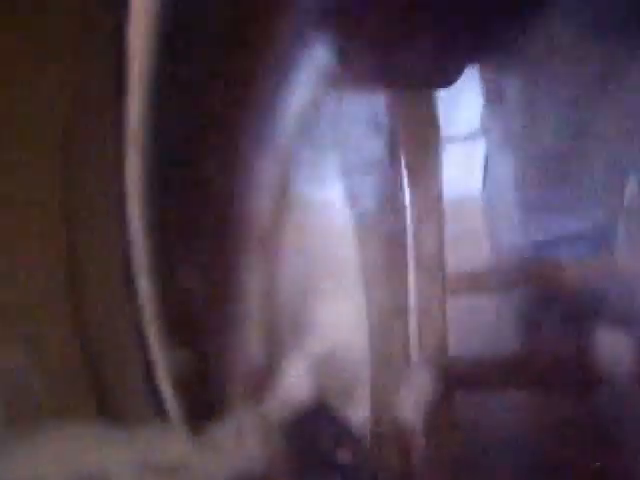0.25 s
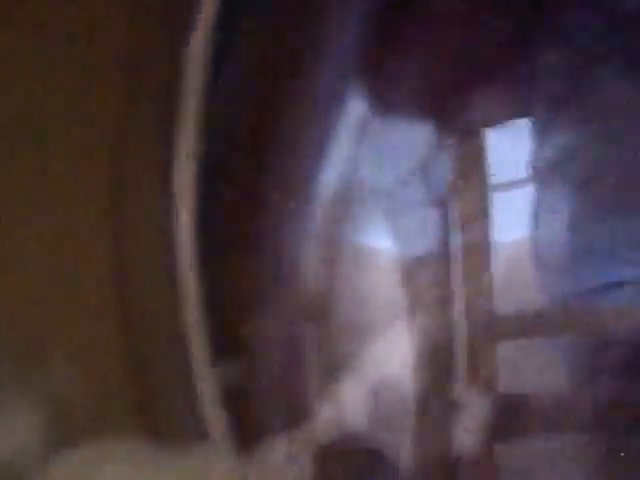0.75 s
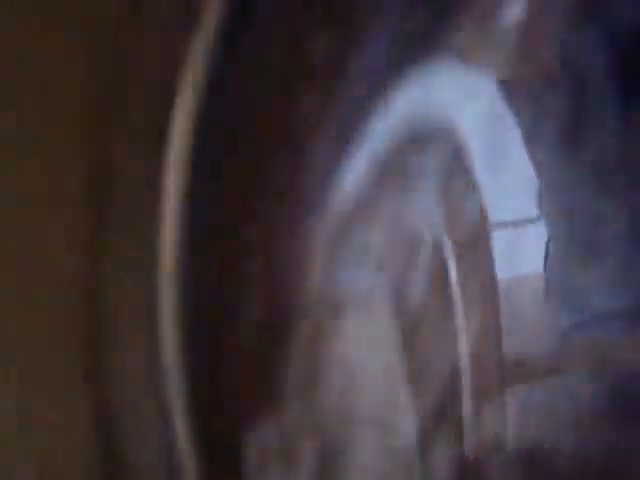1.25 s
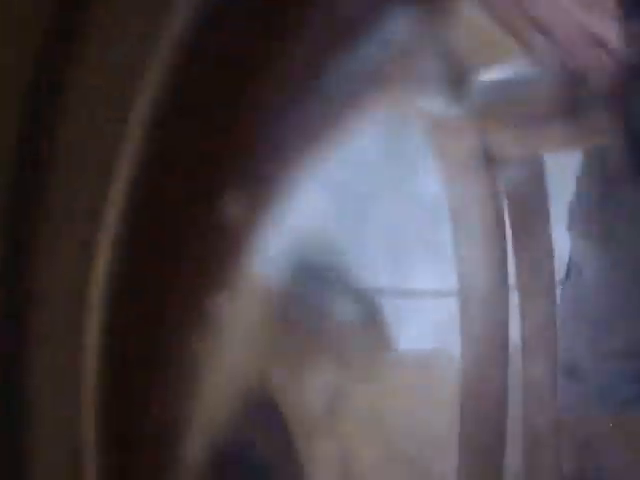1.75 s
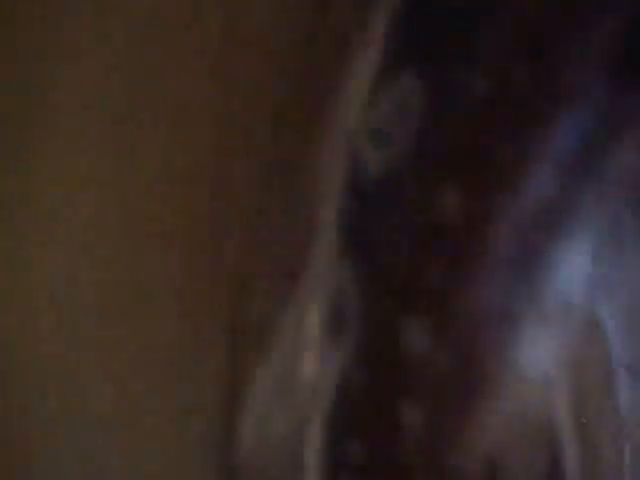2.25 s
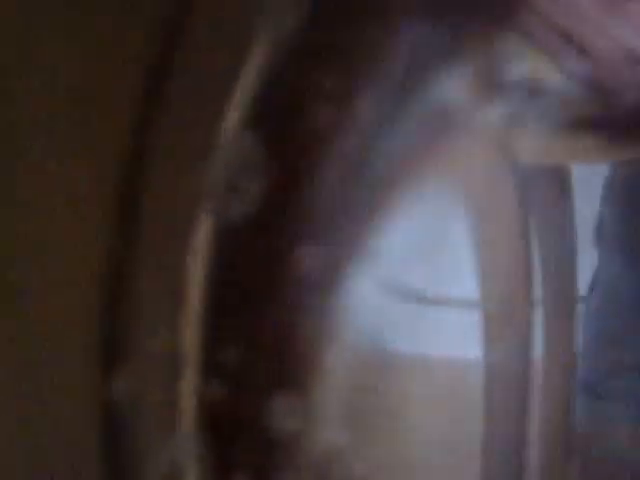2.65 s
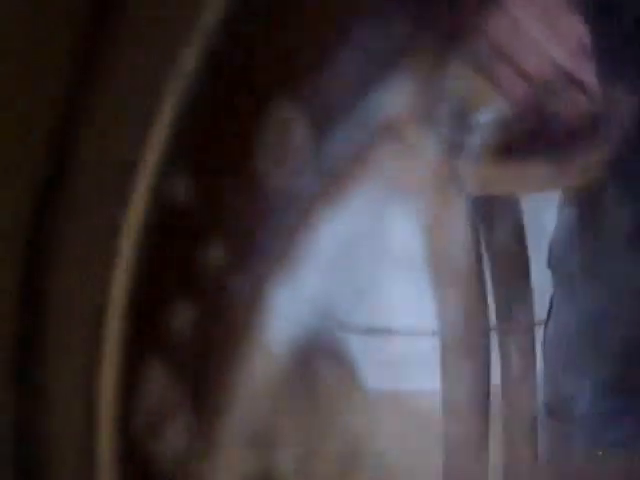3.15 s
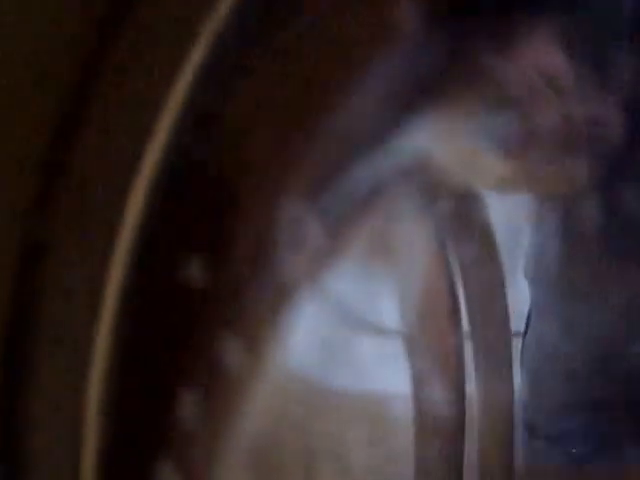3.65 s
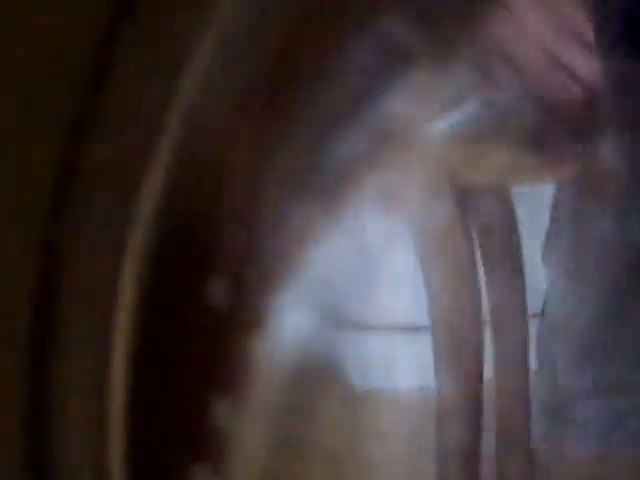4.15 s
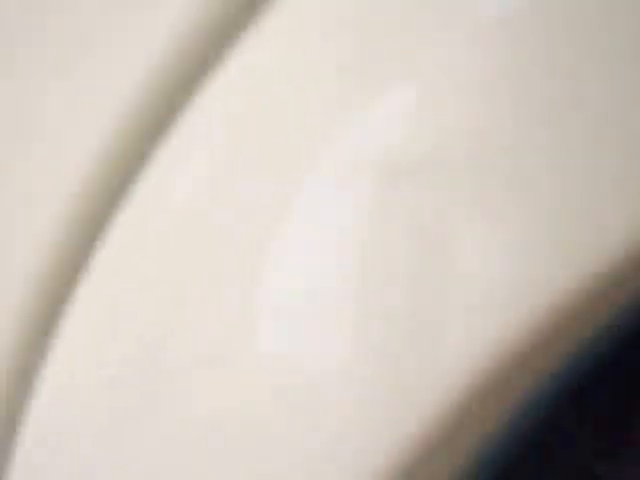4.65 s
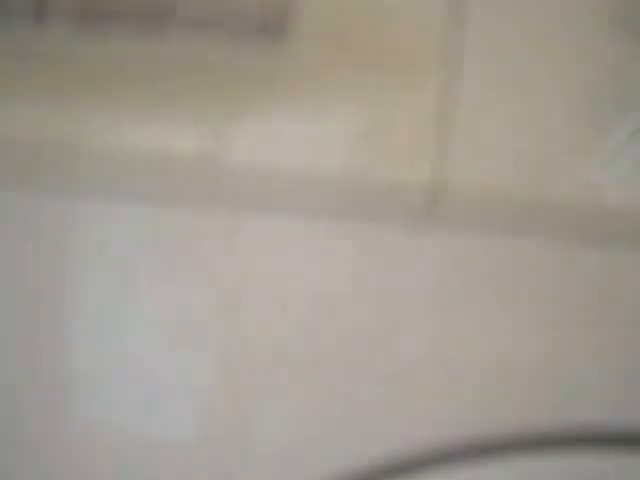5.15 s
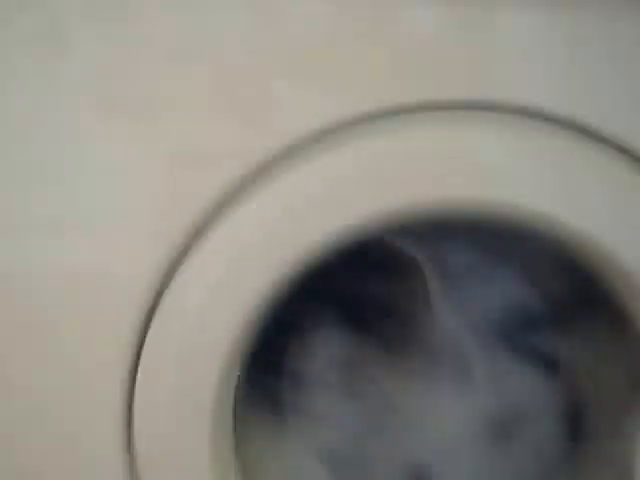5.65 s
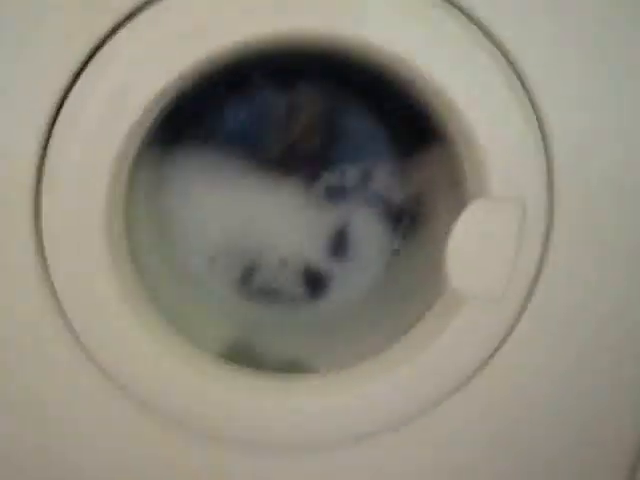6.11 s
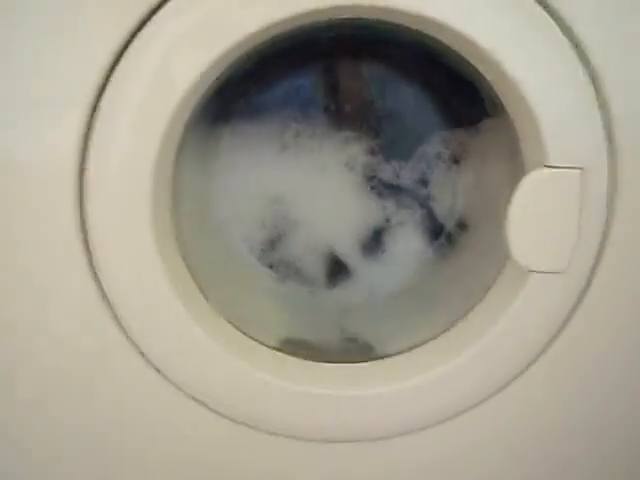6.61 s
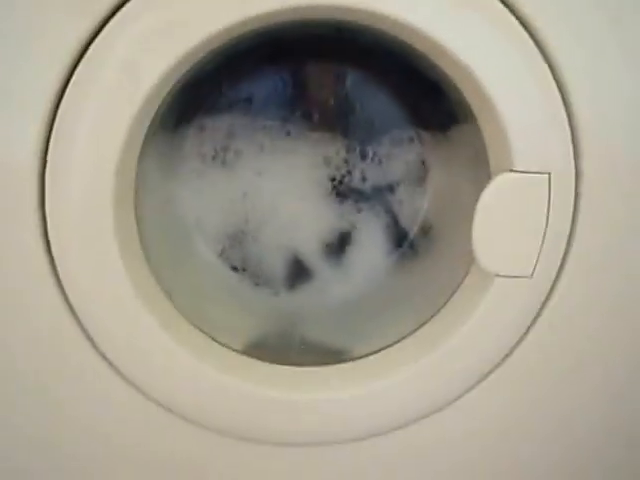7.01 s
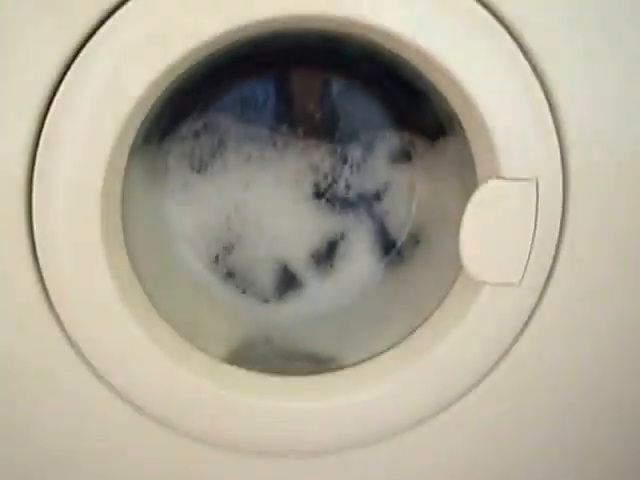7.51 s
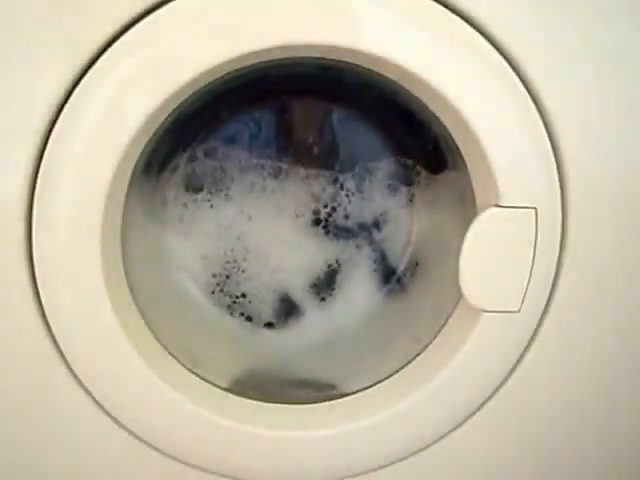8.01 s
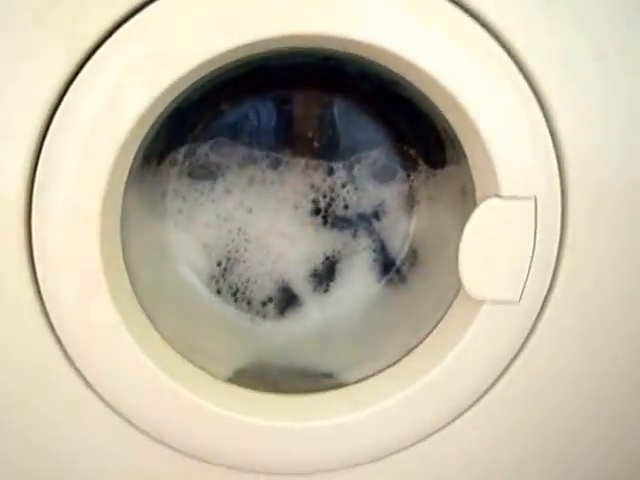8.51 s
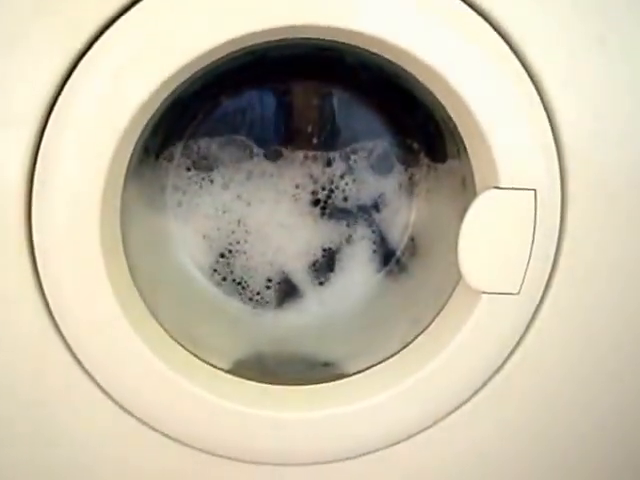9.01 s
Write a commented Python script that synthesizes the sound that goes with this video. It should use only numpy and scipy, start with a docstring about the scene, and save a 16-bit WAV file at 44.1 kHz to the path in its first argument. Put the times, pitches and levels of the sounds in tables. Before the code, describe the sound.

In a small room, a front-loading washing machine hums steadily with a thin whine while wet laundry churns and drops about twice a second. Occasional finger ticks and scrapes sound close by. After about five and a half seconds the motor cuts out, then the handheld camera is gripped anew: sharp clicks, hard thumps, hollow knocks and rubbing right at the microphone, fading to light touches over faint room tone.

```python
"""Washing machine and a handled camera

A front-loader in a small room turns its wet load: motor harmonics hum and whine, filtered noise churns and
fizzes, and bubbles ring at each drop, until the motor cuts out after 5.5 s and faint electronic tones remain.
Fingers on the small camera rub and scrape (shaped noise), click its plastic (short damped bursts), knock its
body (decaying modes) and push air at its microphone (pulses), most strongly as it is moved to a new grip."""
import sys
import numpy as np
from scipy import signal
from scipy.fft import rfft, irfft, next_fast_len
from scipy.io import wavfile
from scipy.ndimage import map_coordinates

SR = 44100
rng = np.random.default_rng(int(sys.argv[2]) if len(sys.argv) > 2 else 0)


def dump_mix(stems):
    """Bounce the given channels to the path in sys.argv[1] as a 16-bit WAV at rate SR."""
    frames = np.atleast_2d(stems).T  # one column per channel
    limited = np.clip(frames, -1, 1)  # hard clip at full scale
    pcm = np.round(limited * 32767).astype(np.int16)
    wavfile.write(sys.argv[1], SR, pcm)


N = 408807
TIME = np.arange(N) / SR


def amp(db):
    """Decibels to gain."""
    return 10 ** (np.asarray(db) / 20)


def unit(x):
    """Scale to rms 1."""
    return x / np.sqrt(np.mean(x ** 2) + 1e-20)


def along(points, hz):
    """Read (Hz, value) points on a log frequency axis."""
    f, v = np.transpose(points)
    return np.interp(np.log(hz + 1), np.log(f), v)


def gain_curve(rows):
    """A gain per sample from (s, dB) rows, 120 dB down outside their span."""
    s, db = np.transpose(rows)
    return amp(np.interp(TIME, s, db, left=-120, right=-120))


def wobble(rate):
    """A smooth random curve with rate knots a second."""
    return map_coordinates(rng.standard_normal(int(N * rate / SR) + 4), [TIME * rate])


def filtered(x, response):
    """Pass x through a response given as a function of frequency."""
    m = next_fast_len(len(x) + 8192)
    return irfft(rfft(x, m) * response(np.fft.rfftfreq(m, 1 / SR)), m)[:len(x)]


def resonance(f, hz, width):
    """Response of one damped mode."""
    return 1j * f * width / (hz * hz - f * f + 1j * f * width)


def noise(spectrum, grain_db=0):
    """Coloured noise of rms 1, made of tiny impacts whose sizes scatter by grain_db."""
    impacts = rng.standard_normal(N) * amp(grain_db * wobble(1500))
    return unit(filtered(impacts, lambda f: amp(along(spectrum, f))))


def add(track, s, sound):
    """Mix a sound into the track at time s."""
    start = round(s * SR)
    sound = sound[max(-start, 0):N - start]
    track[max(start, 0):][:len(sound)] += sound


# How long the small room rings around the microphone. Each row: frequency in Hz, t60 in s.
ROOM_DECAY = [(100, 0.33), (600, 0.27), (2000, 0.26), (10000, 0.16)]


def room(x):
    """The small room's echo: noise in which each frequency dies at its own speed."""
    hz, t, z = signal.stft(rng.standard_normal(SR // 2), SR, nperseg=256)
    decay = amp(-60 * t / along(ROOM_DECAY, hz)[:, None])
    tail = signal.istft(z * decay, SR, nperseg=256)[1]
    return signal.fftconvolve(x, tail / np.linalg.norm(tail))[:N]


# Tones of the machine's electronics, at the microphone. Each row: frequency in Hz, level in dB rms.
IDLE_TONES = [(99.7, -87.5), (199.4, -83.5), (4705, -85.5), (7868, -94)]
# Colour of the room air. Each row: frequency in Hz, relative density in dB per Hz.
ROOM_AIR_SPECTRUM = [(22, -5.5), (50, -3), (75, -15), (160, -19.5), (310, -16), (700, -16), (1500, -21.5),
                     (3300, -20), (5800, -19.5), (10500, -21), (11500, -34.5)]


def idle():
    """Room air as coloured noise, and the faint, slightly unsteady tones of the powered machine."""
    tones = np.zeros(N)
    for hz, db in IDLE_TONES:
        phase = 2 * np.pi * hz * TIME + 0.065 * wobble(3.3)
        tones += amp(db) * np.sqrt(2) * np.sin(phase)
    return tones + amp(-70.5) * noise(ROOM_AIR_SPECTRUM)


# the motor runs at an even pull until it is switched off
STOP_S, RUN_DOWN_DB_PER_S = 5.49, 225


def drive():
    """The motor's pull as a gain: full, then running down."""
    return amp(-RUN_DOWN_DB_PER_S * np.clip(TIME - STOP_S, 0, 1))


PULSE_HZ = 99.8  # magnetic pulse rate
# Motor hum at the microphone, before flutter; the last row is a floor for the panel.
# Each row: multiple of the pulse rate, level in dB rms.
HUM_HARMONICS = [(2, -63.5), (3, -74), (4, -59), (5, -71), (6, -66.5), (7, -77)]
# A cabinet panel singing with the seventh harmonic, before its trim. Each row: time in s, level in dB rms.
PANEL_LEVEL = [(0, -64), (1.5, -61.5), (1.8, -51), (2.2, -59), (2.8, -58), (4.1, -56.5), (4.6, -63),
               (5.5, -72)]
# The thin motor whine across the room. Each row: time in s, level in dB rms.
WHINE_LEVEL = [(0, -72), (1.7, -75.5), (2.05, -68), (2.7, -73), (4.5, -73.5), (5.0, -70.5), (5.8, -66)]
# the whine swells regularly: depth either way, period, time of one crest
WHINE_SWELL_DB, WHINE_SWELL_S, WHINE_PEAK_S = 1, 0.251, 3.065


def motor(flutter_db=1.6, phase_drift=0.62, whine_hz=2397, beat_hz=17, beat_share=0.7,
          whine_drift=0.64, whine_flutter_db=2):
    """Magnetic hum, a singing panel and a thin whine, all shaken by the shifting load."""
    def tone(multiple):
        """One harmonic whose phase and level waver."""
        phase = 2 * np.pi * PULSE_HZ * multiple * TIME + phase_drift * wobble(7)
        return np.sqrt(2) * np.sin(phase) * amp(flutter_db * wobble(13))

    def partial(hz):
        """One whine partial with drifting phase."""
        return np.sin(2 * np.pi * hz * TIME + whine_drift * wobble(30))

    hum = sum(amp(db) * tone(multiple) for multiple, db in HUM_HARMONICS[:-1])
    panel_multiple, panel_floor_db = HUM_HARMONICS[-1]
    panel_gain = amp(-4.5) * (amp(panel_floor_db) + gain_curve(PANEL_LEVEL))
    panel = panel_gain * tone(panel_multiple)
    # two close partials make the whine pulse
    beating = partial(whine_hz) + beat_share * partial(whine_hz - beat_hz)
    swell_db = WHINE_SWELL_DB * np.cos(2 * np.pi * (TIME - WHINE_PEAK_S) / WHINE_SWELL_S)
    whine = unit(beating * amp(swell_db + whine_flutter_db * wobble(44)))
    return drive() * (hum + panel + gain_curve(WHINE_LEVEL) * whine)


# the drum's paddles lift the wash and drop it at an even pace
FIRST_DROP_S, DROP_EVERY_S = 0.064, 0.484


def drop_times():
    """When the paddles drop the wash, for as long as the motor runs."""
    return np.arange(FIRST_DROP_S, STOP_S, DROP_EVERY_S)


# Tumbling across the room between drops, before the trims of its parts. Each row: time in s, level in dB.
TUMBLE_LEVEL = [(0, -58), (0.8, -58.5), (1.5, -55.5), (2.3, -57.5), (4.2, -57), (4.75, -60.5), (5.4, -60),
                (5.8, -70)]
# Foam fizz, before its trim. Each row: time in s, level in dB.
FIZZ_LEVEL = [(0.0, -66), (0.27, -66.5), (2.54, -71.5), (4.22, -71), (4.77, -66), (5.67, -70), (5.8, -70)]
# Colour of the wash in the tub. Each row: frequency in Hz, relative density in dB per Hz.
TUB_SPECTRUM = [(22, -4), (55, -1), (75, -2), (100, -2), (160, -5), (240, -1.5), (480, -11.5), (760, -8.5),
                (860, -11), (1300, -20), (2000, -25.5), (2600, -45.5), (5000, -51.5), (8000, -60)]
# Cabinet resonances stirred by the load. Each row: frequency in Hz, width in Hz, relative level in dB.
CABINET_MODES = [(281.7, 29.8, -3.5), (337, 44.9, 0.5), (395, 25.3, 1), (425.5, 35.4, -3.5),
                 (555, 33.26, 3), (609.7, 41.5, 1), (669, 27.74, 3), (768, 29.2, -9), (897, 39.4, -12),
                 (1008, 69.8, -10.5), (1132, 45.2, -6.5), (1510, 62.6, -9.5), (1698, 68, -15),
                 (2180, 70, -29), (2507, 115, -29.5)]
# Colour of the foam. Each row: frequency in Hz, relative density in dB per Hz.
FOAM_SPECTRUM = [(900, 1), (2000, 2), (2550, 4.5), (3200, 0), (3950, -2), (5000, -7.5), (6300, -7.5),
                 (7700, -0.5), (9700, 1), (11000, -15)]
DROP_DB, DROP_HALF_S = 4.5, 0.032  # swell of the tumbling at each drop, and half its length


def drum():
    """Wet washing churns in the tub, swelling at each drop, and stirs the cabinet; the foam fizzes."""
    drops = sum(np.exp(-((TIME - s) / DROP_HALF_S) ** 2) for s in drop_times())
    tumble = gain_curve(TUMBLE_LEVEL) * amp(DROP_DB * drops)

    def cabinet(f):
        """All modes together, with alternating sign."""
        return sum((-1) ** k * amp(db) * resonance(f, hz, width)
                   for k, (hz, width, db) in enumerate(CABINET_MODES))

    stir_spectrum = [(200, 3.5), (700, -1.5), (1500, -7), (2400, 13.5), (3300, 7), (6000, -2)]
    stirred = unit(filtered(noise(stir_spectrum, grain_db=4.5), cabinet)) * amp(0.56 * wobble(10))
    churn = noise(TUB_SPECTRUM, grain_db=5.5) * amp(2.7 * wobble(13))
    fizz = gain_curve(FIZZ_LEVEL) * noise(FOAM_SPECTRUM, grain_db=1.5)
    return tumble * (amp(-0.5) * stirred + amp(-6) * churn) + amp(1.5) * fizz


# bubbles of a drop: middle level against the tumbling, middle pitch, spread in time
SLOSH_DB, SLOSH_HZ, SLOSH_SPREAD_S = -5, 1054, 0.024


def sloshes(cycles=14, scatter=0.15, count=14):
    """Each drop of the wash raises a cluster of ringing bubbles, each losing 20 dB in so many cycles."""
    out, t = np.zeros(N), np.arange(SR // 20) / SR
    for s in drop_times():
        for when, pitch, size in rng.standard_normal((count, 3)):
            phase = SLOSH_HZ * np.exp(scatter * pitch) * t  # in cycles
            envelope = (1 - np.exp(-phase)) * amp(-20 * phase / cycles)
            bubble = np.sin(2 * np.pi * phase) * envelope
            add(out, s + SLOSH_SPREAD_S * when, amp(SLOSH_DB + 2.0 * size) * bubble)
    return gain_curve(TUMBLE_LEVEL) * out


# Strokes of skin on the case, right at the microphone, before trims.
# Each row: start in s, length in s, firm rub in dB, light brush in dB.
SLIDES_ON_CASE = [(0.0, 0.14, -63, -60.5), (5.187, 0.17, -66.5, -66.5), (5.554, 0.35, -69.5, -68.5),
                  (5.89, 0.16, -60, -54.5), (6.21, 0.08, -54.5, -75), (6.4, 0.12, -56.5, -78.5),
                  (6.521, 0.23, -49.5, -60), (6.76, 0.13, -63.5, -60), (7.223, 0.54, -67.5, -68),
                  (8.36, 0.29, -76, -65), (8.78, 0.38, -78.5, -77)]
GRIP_DB_PER_S, LIFT_DB_PER_S = 250.5, 140  # how fast a stroke sets in and lets go
PRESSURE_DB = 1.5  # unevenness of the pressure within a stroke


def strokes():
    """Gains of the firm rub and the light brush: each stroke sets in, holds and lets go."""
    firm, light = np.zeros(N), np.zeros(N)
    for s, length, firm_db, light_db in SLIDES_ON_CASE:
        before, after = np.maximum(s - TIME, 0), np.maximum(TIME - s - length, 0)
        shape_db = -GRIP_DB_PER_S * before - LIFT_DB_PER_S * after
        firm = np.maximum(firm, amp(firm_db + shape_db))
        light = np.maximum(light, amp(light_db + shape_db))
    pressure = amp(PRESSURE_DB * wobble(22))
    return firm * pressure, light * pressure


HARD_PRESS_DB = -4.5  # a touch in the push table above this level is a hard press
# a hard press also drags the skin with a low rumble, for longer after a softer contact
DRAG_DB, DRAG_AFTER_S, DRAG_HALF_S, DRAG_HZ, DRAG_OCTAVES = -24, 0.016, 0.0053, 230, 1.1


def drags(linger=2.2):
    """The low scrape that follows each hard press; it lasts longer by linger contact times."""
    return [(s + DRAG_AFTER_S, db + DRAG_DB, DRAG_HALF_S + linger * contact, DRAG_HZ, DRAG_OCTAVES)
            for s, db, contact in AIR_PUSHES if db > HARD_PRESS_DB]


# Colour of the firm rub close to the microphone. Each row: frequency in Hz, relative density in dB per Hz.
FIRM_SPECTRUM = [(150, 3.5), (600, 2.5), (1100, -2), (2000, -2), (3200, -1.5), (4100, 3), (5500, -8),
                 (9000, -34)]
# Colour of the light brush. Each row: frequency in Hz, relative density in dB per Hz.
LIGHT_SPECTRUM = [(1500, -22.5), (4000, -3), (6500, 1.5), (8000, 3), (11000, -14)]
# Short scrapes of a finger on the case.
# Each row: middle in s, level there in dB rms, half length in s, centre in Hz, spread in octaves.
FINGER_SCRAPES = [(0.222, -69.5, 0.088, 3970, 0.084), (0.547, -60, 0.032, 4900, 0.63),
                  (0.842, -55.5, 0.027, 4570, 0.53), (0.938, -50, 0.0071, 1300, 0.88),
                  (1.028, -60.5, 0.026, 4200, 0.67), (1.357, -53, 0.01, 4800, 1.7),
                  (1.561, -70, 0.17, 4050, 0.06), (2.063, -65, 0.029, 4000, 1.8),
                  (2.409, -62.5, 0.02, 3960, 0.74), (2.952, -64.5, 0.014, 3800, 0.1),
                  (5.581, -54, 0.0092, 1900, 0.73), (5.91, -36.5, 0.0093, 1340, 2.1),
                  (5.998, -45.5, 0.0089, 7000, 0.53), (6.048, -50, 0.007, 1190, 2.1),
                  (6.237, -46, 0.041, 3100, 0.49), (6.295, -36, 0.012, 2450, 0.37),
                  (6.295, -45.5, 0.024, 300, 2), (6.392, -43.5, 0.023, 300, 1.5),
                  (6.576, -28, 0.015, 1700, 0.6), (6.599, -30, 0.014, 3580, 0.41),
                  (6.703, -46.5, 0.026, 4560, 0.41), (7.203, -47, 0.0038, 1190, 2.38),
                  (7.644, -53, 0.0072, 1780, 0.88), (7.681, -57, 0.01, 1500, 2),
                  (7.725, -56.5, 0.012, 3800, 0.75), (7.943, -57, 0.024, 2400, 0.92),
                  (8.346, -58.5, 0.0043, 1383, 0.8), (8.752, -52.5, 0.031, 1700, 2.38),
                  (9.081, -65, 0.033, 942, 0.46)]


def rubbing(grain_db=2.5, case_hz=4050, case_width=500, case_db=-2, skin_ratio=5):
    """Skin catches and slips on the case: long slides with short scrapes among them."""
    firm, light = strokes()
    firm_rub = amp(0.5) * firm * noise(FIRM_SPECTRUM, grain_db=3.0)
    light_brush = amp(-1.5) * light * noise(LIGHT_SPECTRUM, grain_db=3)
    scrapes, t = np.zeros(N), np.arange(-SR // 4, SR // 4) / SR
    slips = rng.standard_normal(N) * amp(grain_db * np.tanh(wobble(900)) * 2.9)
    for s, db, half, hz, spread in FINGER_SCRAPES + drags():
        def colour(f):
            """A hump of pitch, rounded off by soft skin and ringing with the case."""
            hump = np.exp(-(np.log2((f + 1) / hz) / spread) ** 2 / 4)
            softness = 1 / np.hypot(1, (f / (skin_ratio * hz)) ** 2)
            case = 1 + amp(case_db) * resonance(f, case_hz, case_width)
            return hump * softness * case

        excerpt = np.roll(slips, rng.integers(N))[:len(t)]
        stroke = unit(filtered(excerpt, colour))
        add(scrapes, s - len(t) / SR / 2, amp(db) * stroke * np.exp(-(t / half) ** 2))
    return firm_rub + light_brush + scrapes


# faint ticks fall at random while a stroke lasts: rate, ring over the firm rub, its cap, then scatter either way
TICKS_PER_S, TICK_DB, TICK_TOP_DB, TICK_SCATTER_DB = 6.7, 22, -44.5, 4.5
# their ring; pop and crack against the ring; all levels before the trims of clicks()
TICK_HZ, TICK_T60_S, TICK_POP_DB, TICK_CRACK_DB = 3880, 0.006, -11.5, -8


def faint_ticks():
    """The case ticks at random under a sliding finger, more strongly under a firm one."""
    ticks = []
    for s, length, firm_db, _ in SLIDES_ON_CASE:
        for when, size in rng.random((round(TICKS_PER_S * length), 2)):
            db = min(firm_db + TICK_DB, TICK_TOP_DB) + TICK_SCATTER_DB * (2 * size - 1)
            ticks.append((s + when * length, db, TICK_HZ, TICK_T60_S, db + TICK_POP_DB, db + TICK_CRACK_DB))
    return ticks


# Ticks of the plastic case around the microphone, levels before trims; the row at 6.4763 s # is instead the
# sharp crack at the onset of the hardest push of air. # Each row: start in s, ring peak in dB, ring in Hz, ring
# t60 in s, hollow pop in dB, bright crack in dB.
CASE_CLICKS = [(0.0796, -37, 4000, 0.0064, -44, -51), (0.8715, -33.5, 4100, 0.0086, -48, -40),
               (1.452, -25, 3400, 0.003, -39.5, -27), (2.222, -30.5, 3870, 0.031, -56, -46),
               (3.5648, -41, 3360, 0.012, -68, -46), (5.7348, -35, 4150, 0.015, -68, -40.5),
               (5.7715, -38, 4140, 0.0076, -70, -39), (5.8496, -36.5, 5200, 0.0097, -57, -36),
               (5.8668, -31.5, 4040, 0.0063, -64, -41), (6.0977, -16, 3810, 0.01, -39.5, -33.5),
               (6.1996, -30, 3940, 0.0068, -55, -55), (6.4763, -13.5, 2130, 0.0018, -19, -32),
               (6.559, -8, 2870, 0.006, -17.5, -30), (6.8622, -23.5, 3860, 0.015, -33.5, -34.5),
               (6.8777, -17.5, 2950, 0.012, -26, -38.5), (7.424, -43.5, 3210, 0.011, -70, -73),
               (7.5942, -27.5, 2830, 0.007, -41.5, -36), (7.9471, -32.5, 2880, 0.0096, -39.5, -54),
               (8.6705, -25, 3900, 0.0056, -27.5, -26), (8.7145, -38, 2320, 0.0049, -33.5, -56),
               (8.7245, -35.5, 3740, 0.0078, -44, -41), (8.766, -35.5, 3700, 0.0061, -38, -38.5),
               (8.8911, -54, 4130, 0.006, -46, -48)]


def clicks(pop_hz=1200, pop_t60=0.0031, crack_t60=0.0026, rattle_db=-26, rattle_t60=0.027, ring_share=0.72):
    """Each tick is a bright crack, a few cycles of ring, a hollow pop of the case and a slight rattle."""
    out, t = np.zeros(N), np.arange(SR // 20) / SR

    def damped(hz, t60):
        """A decaying tone."""
        return np.sin(2 * np.pi * hz * t) * amp(-60 * t / t60)

    def burst(t60):
        """Decaying noise."""
        return rng.standard_normal(len(t)) * amp(-60 * t / t60)

    def band(x, low_hz, high_hz):
        """One register of the tick, at peak 1."""
        x = signal.sosfilt(signal.butter(2, [low_hz, high_hz], "bandpass", fs=SR, output="sos"), x)
        return x / np.abs(x).max()

    for s, db, hz, t60, pop_db, crack_db in CASE_CLICKS + faint_ticks():
        ring = ring_share * damped(hz, t60) + burst(t60) + amp(rattle_db) * burst(rattle_t60)
        pop = 0.28 * damped(pop_hz, pop_t60) + burst(3.6 * pop_t60)
        crack = burst(crack_t60) + amp(rattle_db) * burst(rattle_t60)
        tick = amp(db - 3.0) * band(ring, 1500, 5000)
        tick += amp(pop_db + 1.5) * band(pop, 460, 1500)
        tick += amp(crack_db + 3.5) * band(crack, 5800, 10000)
        add(out, s + 0.00054, tick)
    return out


# Hollow knocks on the body that holds the microphone.
# Each row: start in s, peak in dB, brightness in Hz, damping factor.
BODY_KNOCKS = [(6.371, -29, 317, 1.1), (6.728, -10, 845, 1), (6.878, -17.5, 1950, 0.79),
               (7.434, -45.5, 419, 0.56), (7.47, -43, 424, 0.8), (8.342, -45.5, 1100, 0.91),
               (8.673, -41.5, 604, 1), (8.717, -35, 1320, 30), (8.89, -50, 1400, 2.6)]
# What the knocks ring with. Each row: frequency in Hz, relative level in dB, t60 in s at damping 1.
BODY_MODES = [(210, -12, 0.015), (366, -2, 0.046), (480.4, -5.5, 0.048), (587, -0.5, 0.029),
              (710, -3, 0.038), (870, -7.5, 0.03), (1021, -12, .025), (1470, -5, 0.031), (1757, -10, 0.016),
              (2770, -15, 0.0099), (3830, -11.5, .008)]


def knocks():
    """Blows ring the hollow body; a soft one leaves the upper modes quiet, a tight grip damps them all."""
    out, t = np.zeros(N), np.arange(SR // 5) / SR
    for s, db, bright_hz, damping in BODY_KNOCKS:
        ring = np.zeros(len(t))
        for hz, level_db, t60 in BODY_MODES:
            mode_db = level_db + rng.normal(0, 1.2) - 60 * damping * t / t60
            ring += amp(mode_db) * np.sin(2 * np.pi * hz * t)
        # the contact time cuts the treble; a small body radiates little bass
        ring = signal.sosfilt(signal.butter(3, [130, bright_hz], "bandpass", fs=SR, output="sos"), ring)
        add(out, s, amp(db) * ring / np.abs(ring).max())
    return out


# a hard press rebounds, ever faster and weaker: first gap, next gap over it
REBOUND_S, REBOUND_SHRINK = 0.0127, 0.86
REBOUND_DB, REBOUND_LOSS_DB = -11.5, 3.8  # first level against the press, loss for each further one


def rebounds(count=3):
    """The smaller pushes that follow each hard press."""
    delays = np.cumsum(REBOUND_S * REBOUND_SHRINK ** np.arange(count))
    return [(s + delay, db + REBOUND_DB - REBOUND_LOSS_DB * k, contact)
            for s, db, contact in AIR_PUSHES if db > HARD_PRESS_DB for k, delay in enumerate(delays)]


# Fingers pressing air into the microphone port, levels before the trim and the bass roll-off.
# Each row: time in s, peak in dB, contact time in s.
AIR_PUSHES = [(5.738, -36.5, 0.0081), (5.87, -29, 0.0055), (5.906, -33, 0.0024), (6.045, -35.5, 0.00035),
              (6.201, -34.5, 0.00032), (6.342, -28.5, 0.00043), (6.371, -30.5, 0.0018),
              (6.446, -28.5, 0.0015), (6.477, 1, 0.00087), (6.536, -15, 0.0013), (6.55, -12.5, 0.003),
              (6.5554, -6.5, 0.0009), (6.5623, 0.5, 0.0048), (6.674, -29, 0.00022), (7.945, -37, 0.00012),
              (9.11, -47, 0.00025)]


def thumps(port_hz=72, port_width=115):
    """A push of air per touch; the microphone's bass roll-off makes it swing back."""
    out, t = np.zeros(N), np.arange(-SR // 40, SR // 40) / SR
    for s, db, contact in AIR_PUSHES + rebounds():
        push = np.exp(-np.abs(t) / np.where(t < 0, 0.62 * contact, contact))  # rises faster than it falls
        add(out, s + t[0], amp(db + 4.5) * push)
    return filtered(out, lambda f: -f * f / (port_hz ** 2 - f * f + 1j * f * port_width))


def scene():
    """The machine across the room, with handling sounds right at the microphone and their echo."""
    blows, case, pushes = knocks(), rubbing() + clicks(), thumps()
    echo = room(amp(-18.5) * blows + amp(-22.0) * case + amp(-35.0) * pushes)
    machine = motor() + drum() + sloshes() + idle()
    return (machine + blows + case + pushes + echo)[None]


TOP_HZ = 11050  # the camera's band limit


def record(dry):
    """The camera clips at full scale, then cuts steeply above its band limit."""
    clipped = np.clip(dry[0], -1, 1)
    return filtered(clipped, lambda f: 1 / np.hypot(1, (f / TOP_HZ) ** 44))[None]


dry = scene()
out = record(dry)
dump_mix(out)
```